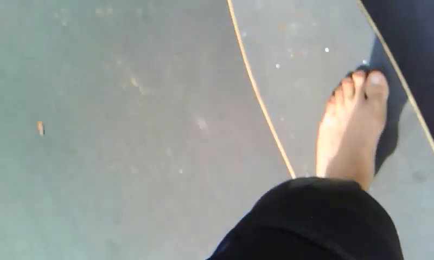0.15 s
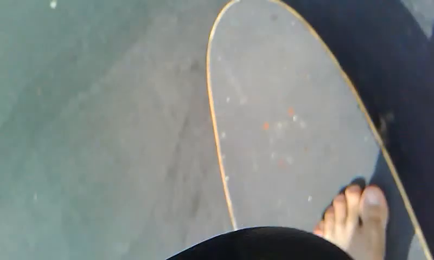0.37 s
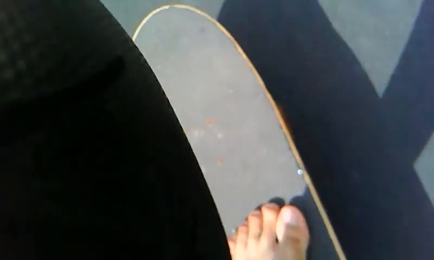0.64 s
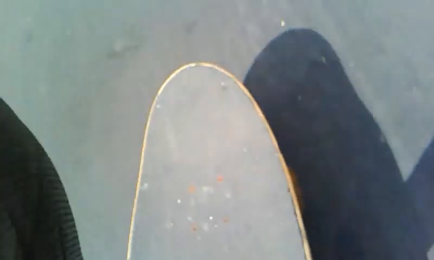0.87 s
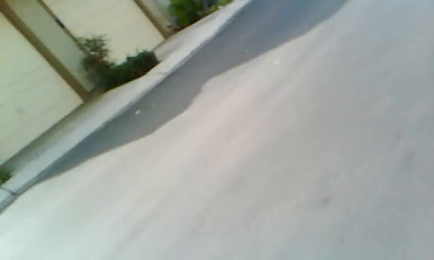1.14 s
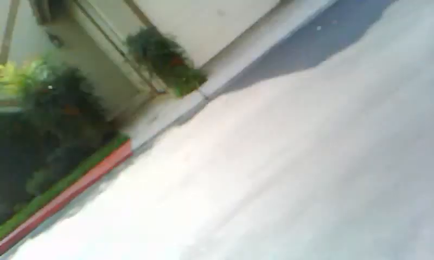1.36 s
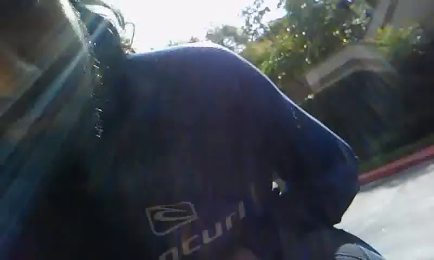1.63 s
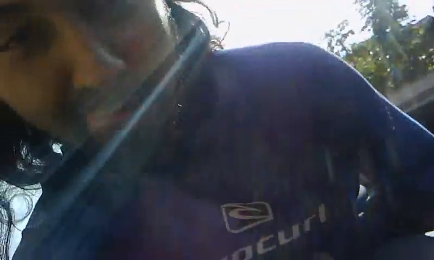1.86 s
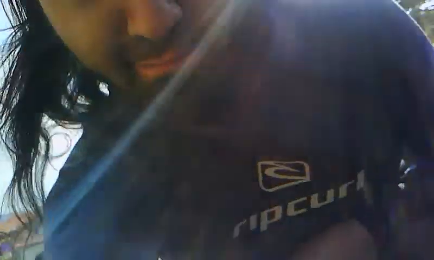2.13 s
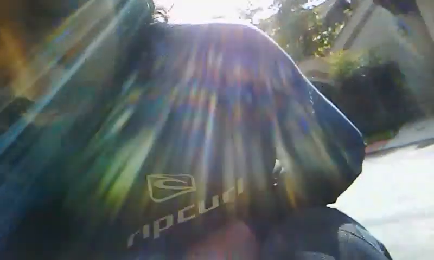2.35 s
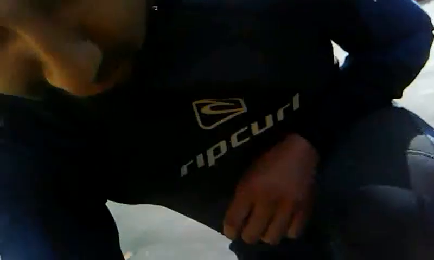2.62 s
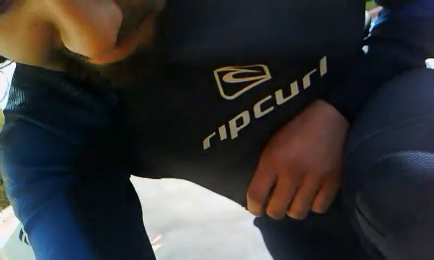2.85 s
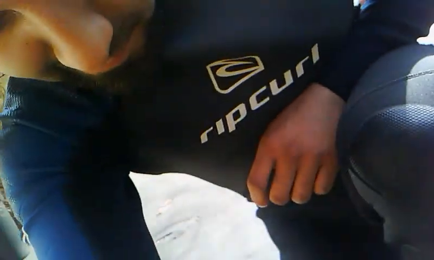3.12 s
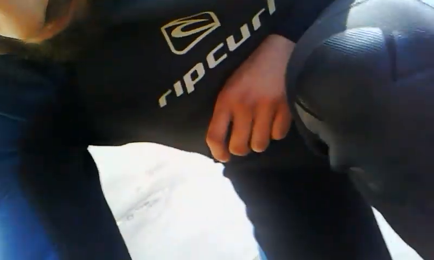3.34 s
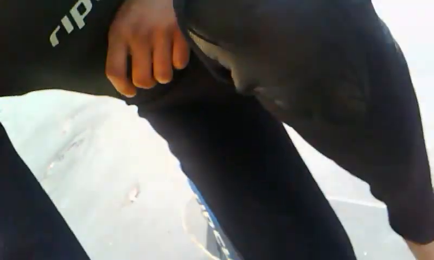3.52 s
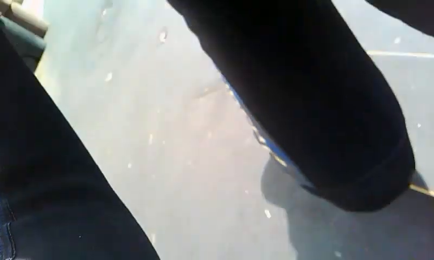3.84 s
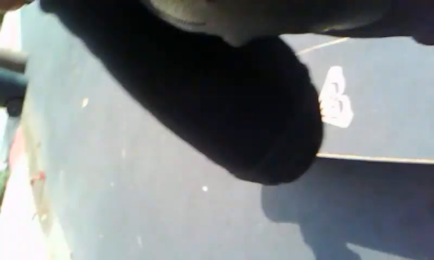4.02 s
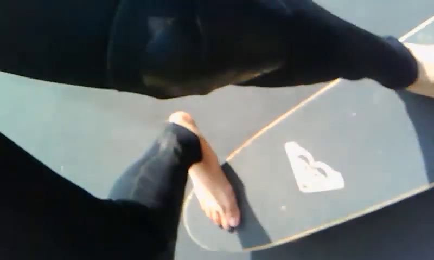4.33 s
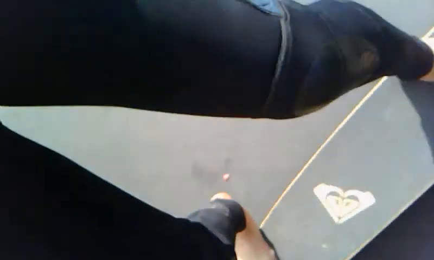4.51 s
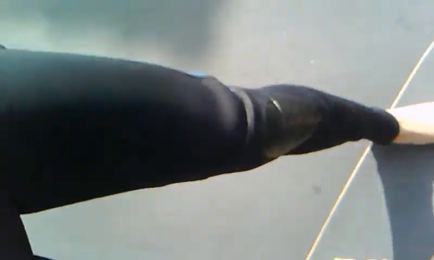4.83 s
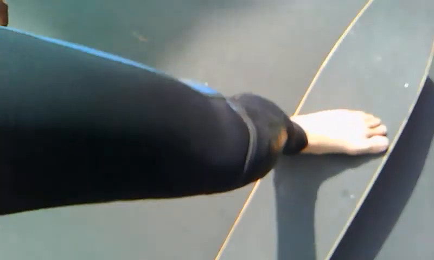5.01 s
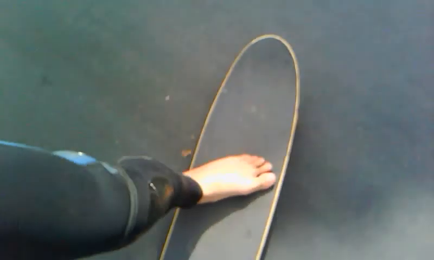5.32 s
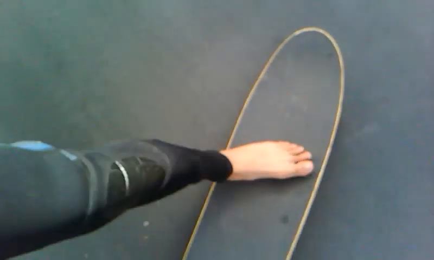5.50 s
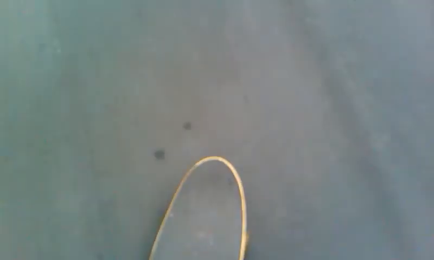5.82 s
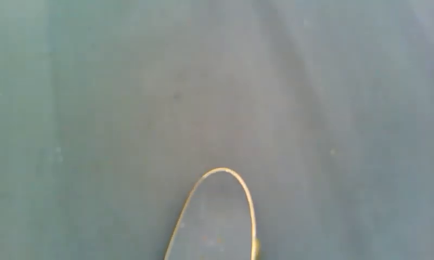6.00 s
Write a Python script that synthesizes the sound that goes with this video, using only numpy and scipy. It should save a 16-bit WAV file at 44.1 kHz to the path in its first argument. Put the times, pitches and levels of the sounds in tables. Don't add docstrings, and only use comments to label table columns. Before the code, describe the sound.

A board rolls on rough paving outdoors, heard through a small hand-held microphone in a hollow case, dull above about 4 kHz. From 0 to 1 s the wheels give a full, hollow rumble around 300-750 Hz with crackling grit, low fluttering wind and little cloth scuffs, including a quick rising zip at 0.3 s. Near 1 s the sound suddenly turns more shielded and hissy after a rough patch. A cluster of sharp snaps and scraping comes at 1.3 s, with a soft low bump at 1.42 s. The roll then continues evenly to about 4 s, with faint rubs and a gust at 3.1 s. From 4.2 s it surges in repeated swells. Hard, distorted, hollow knocks strike at 4.47, 4.89, 5.25 and 5.65 s, with a rattle, fading hiss and thin metallic hum; a faint ringing tap falls at 5.09 s. Small ticks and scuffs follow near 5.9 s as rolling swells again.

```python
import sys
import numpy as np
from scipy import signal
from scipy.fft import rfft, irfft, next_fast_len
from scipy.io import wavfile
from scipy.ndimage import uniform_filter1d, map_coordinates

SR = 44100
rng = np.random.default_rng(int(sys.argv[2]) if len(sys.argv) > 2 else 0)


def master(y):
    cut = np.clip(np.atleast_2d(y).T, -1, 1)
    pcm = np.round(cut * 32767)
    wavfile.write(sys.argv[1], SR, pcm.astype(np.int16))


def boost_factor(decibels):
    exponent = np.asarray(decibels, float) / 20
    return 10 ** exponent


N = 271656


def unit(x):
    return x / np.sqrt(np.mean(x ** 2) + 1e-20)


def along(points, hz):
    f, v = np.transpose(points)
    return np.interp(np.log(hz + 1), np.log(f + 1), v)


def curves(rows):
    s, *columns = np.transpose(rows)
    return [np.interp(np.arange(N) / SR, s, column) for column in columns]


def swells(rows):
    t = np.arange(N) / SR
    return sum(db * np.cos(np.pi * np.clip((t - s) / length, -.5, .5)) for s, db, length in rows)


def wobble(rate):
    knots = rng.standard_normal(int(N * rate / SR) + 4)
    return map_coordinates(knots, [np.arange(N) * rate / SR])


def filtered(x, response):
    m = next_fast_len(len(x) + SR // 4)
    return irfft(rfft(x, m) * response(np.fft.rfftfreq(m, 1 / SR)), m)[:len(x)]


def resonant(x, modes):
    def one(f, centre, width):
        return 1j * f * width / (centre * centre - f * f + 1j * f * width)

    def response(f):
        return sum((-1) ** k * boost_factor(db) * one(f, hz, width) for k, (hz, width, db) in enumerate(modes))

    return filtered(x, response)


def grit(rate, spread_db, smooth):
    chance, side, size = rng.random((3, N))
    stones = (chance < rate / SR) * np.sign(side - .5) * boost_factor(-spread_db * np.log(size + 1e-4))
    return np.sqrt(1 - smooth) * unit(stones) + np.sqrt(smooth) * rng.standard_normal(N)


# start_s (middle of the turn), length_s
CAMERA_TURNS = [
    (0.979, 0.035),
    (4.317, 0.14),
]


def poses():
    t = np.arange(N) / SR
    first, second = [np.clip((t - s) / length + .5, 0, 1) for s, length in CAMERA_TURNS]
    return 1 - first, first - second, second


# start_s, level_db (deck), coarse_db (hiss from coarser paving)
WHEEL_LEVELS = [(0.0, -34, 3.5), (0.11, -31.5, -0.5), (0.37, -25.5, -5), (1.05, -31, 6.5),
                (1.16, -28.5, 2.5), (1.84, -30.5, -0.5), (2.58, -30, -3.5), (2.71, -29.5, -3.5),
                (3.69, -31, 2), (3.93, -33, 3), (4.07, -36.5, 5)]


def wheels():
    return curves(WHEEL_LEVELS)


# nearest_s, gain_db, length_s
ARM_SWINGS = [
    (4.25, 11.5, 0.38),
    (4.666, 8.5, 0.33),
    (5.04, 10.5, 0.3),
    (5.46, 12.5, .3),
    (5.91, 11, 0.24),
    (6.064, 3.5, 0.13),
    (5.75, -1, 0.054),
    (6.16, 8.5, .06),
]


def swings():
    return swells(ARM_SWINGS)


# pitch_hz, width_hz, level_db
DECK_MODES = [
    [(283, 370, -4.5), (440, 135, 5.5), (596, 45.4, 6.5), (753, 110, -1), (928, 60, -8.5)],
    [(293.8, 54, -7.5), (430, 125, -10.5), (594.8, 36.5, 2), (740, 120, -4), (789, 134, -4),
     (1100, 480, -24.5)],
    [(300, 100, -5), (457.3, 58, 3), (560, 77, -3), (760, 121, -2), (890, 380, -11.5)],
]
DECK_POSE_DB = [-3, -1.5, -4]
# peak_s, gain_db, length_s
PAVING_SLABS = [
    (.2, 4, 0.13),
    (.5, 3, 0.082),
    (.76, 3, .14),
    (.93, 2, 0.11),
    (1.02, 7, 0.14),
    (1.36, 1, 0.06),
    (1.72, -4, 0.066),
    (2.85, -4, 0.14),
    (3.23, -2, 0.1),
    (3.89, -4.5, .06),
]


def deck():
    level_db = wheels()[0] + np.dot(DECK_POSE_DB, poses()) + swings() + swells(PAVING_SLABS) + 0.73 * wobble(9)
    road = grit(rate=990, spread_db=2.0, smooth=0.64) * boost_factor(1.1 * wobble(25))

    def steep(hz):
        return 1 / (1 + (hz / 1300) ** 4) / (1 + (200 / (hz + 1)) ** 4)

    heard = [unit(filtered(resonant(road, modes), steep)) for modes in DECK_MODES]
    return boost_factor(level_db) * sum(weight * sound for weight, sound in zip(poses(), heard))


# pitch_hz, level_db (per Hz)
HISS_COLOURS = [
    [(590, -26), (1000, -2), (1120, -11.5), (1610, -11.5), (2460, -15), (3330, -13.5), (4020, -18.5),
     (4500, -47.5), (5850, -78), (9900, -120)],
    [(590, -38), (1000, -4.5), (1080, -3), (1200, -8), (1570, -9.5), (2020, -18), (3310, -23),
     (3990, -23.5), (4500, -55), (5850, -91), (9900, -120)],
    [(590, -30.5), (1000, -7), (1090, -2), (1330, -8), (1940, -11), (3220, -19), (3750, -18), (4280, -42.5),
     (4500, -50.5), (5850, -90), (9900, -120)],
]
HISS_POSE_DB = [-20, -23.5, -26]


def hiss():
    near_db, coarse_db = wheels()
    level_db = near_db + coarse_db + np.dot(HISS_POSE_DB, poses()) + 0.34 * swings() + aftershock()
    road = grit(rate=2500, spread_db=3, smooth=.7)
    heard = [unit(filtered(road, lambda hz: boost_factor(along(colour, hz)))) for colour in HISS_COLOURS]
    fine = sum(weight * sound for weight, sound in zip(poses(), heard))
    z = signal.stft(fine, nperseg=512)[2]
    patches = uniform_filter1d(uniform_filter1d(rng.standard_normal(z.shape), 6, 0), 4, 1)
    fine = signal.istft(z * boost_factor(2.4 * unit(patches)), nperseg=512)[1][:N]
    return boost_factor(level_db + 5.5) * unit(boost_factor(1.2 * wobble(30)) * fine)


# pitch_hz, level_db (per Hz)
WIND_COLOUR = [(15, -66.5), (25, -36.5), (43, -20), (76, -13.5), (113, -4), (157, -2), (188, 0),
               (330, -10.5), (430, -31), (730, -120)]
# start_s, level_db
STEADY_WIND = [(0.0, -34), (0.6, -28), (1.0, -38.5), (1.42, -41.5), (1.6, -45.5), (2.09, -45.5),
               (2.24, -43.5), (3.03, -46.5), (3.15, -47), (3.76, -45.5), (4.19, -53), (4.4, -53)]
# peak_s, gain_db, length_s
WIND_GUSTS = [(.05, -0.5, 0.12), (.22, 3.5, 0.068), (.33, 5, 0.064), (.5, 3.5, 0.24), (.63, -6.5, 0.094),
              (.74, 2, 0.1), (1.27, 5, 0.12), (1.54, 5, 0.12), (1.89, 6, 0.2), (2.1, -4.5, 0.08),
              (2.47, 2.5, .1), (3.09, 9.5, 0.11), (3.47, 1, 0.12), (4.3, -5, 0.32), (5.1, -7.5, .12),
              (5.91, 6, 0.11), (6.1, -2.5, .2)]


def buffet():
    level_db = curves(STEADY_WIND)[0] - 0.5 + 0.74 * swings() + swells(WIND_GUSTS) + 0.8 * wobble(6.4)
    air = filtered(rng.standard_normal(N), lambda hz: boost_factor(along(WIND_COLOUR, hz)))
    lumps = unit(boost_factor(2.2 * wobble(16)) * air)
    hum = unit(resonant(resonant(rng.standard_normal(N), [(127.6, 19, 0)]), [(133, 140, 0)]))
    hum_share = .06 + .4 * poses()[1]
    return boost_factor(level_db) * (np.sqrt(1 - hum_share) * lumps + np.sqrt(hum_share) * hum)


# start_s, level_db
GRIT_FLICKS = [(0.076, -46), (.81, -54), (1.112, -42.5), (1.229, -44), (1.744, -54), (2.36, -50),
               (3.062, -54), (3.265, -52), (3.544, -45), (3.57, -51.5), (3.678, -49), (3.77, -51.5),
               (4.237, -38), (4.392, -46), (4.709, -46.5), (4.765, -47), (5.008, -41.5), (5.12, -47)]
# start_s, length_s, level_db
GRIT_DRAGS = [
    (1.291, 0.011, -30.5),
    (1.297, .036, -42),
    (1.385, 0.082, -36),
    (3.423, .056, -46),
    (3.984, .33, -45.5),
    (5.835, .055, -45),
    (5.948, 0.015, -45.5),
]
# start_s, length_s, pitch_hz (at first), level_db
CLOTH_SCUFFS = [(.264, .052, 3380, -46), (0.306, 0.024, 3080, -39.5), (0.339, 0.1, 3256, -43),
                (0.358, .073, 2607, -42), (0.44, .087, 2763, -45), (0.512, 0.021, 1546, -43),
                (0.729, 0.067, 3010, -62), (0.737, 0.044, 1903, -43), (0.91, .065, 1996, -44),
                (0.93, 0.02, 3120, -45.5), (0.977, 0.078, 3130, -52.5), (1.419, 0.026, 1096, -32),
                (2.59, 0.082, 2304, -48.5), (2.594, 0.042, 3220, -53.5), (4.325, 0.046, 3050, -43),
                (5.465, .065, 1912, -46), (5.474, 0.055, 3050, -51), (5.762, 0.02, 1590, -42.5),
                (5.882, 0.059, 1686, -34.5)]
# start_s, pitch_hz (at first), level_db
CLOTH_ZIPS = [
    (0.292, 1725, -37.5),
    (4.157, 1260, -39.5),
    (4.323, 1456, -40.5),
]


def strokes():
    flicks = [(s, .026, 2463, 0, 1700, db) for s, db in GRIT_FLICKS]
    drags = [(s, length, 2503, 3000, 1400, db) for s, length, db in GRIT_DRAGS]
    narrow = [(s, length, hz, 3000, 450, db) for s, length, hz, db in CLOTH_SCUFFS]
    zips = [(s, 0.068, hz, 26000, 590, db) for s, hz, db in CLOTH_ZIPS]
    return flicks + drags + narrow + zips


def scuffs():
    out = np.zeros(N)
    for s, length, first_hz, rise_hz, width_hz, db in strokes():
        u = np.linspace(0, 1, round(length * SR))
        phase = 2 * np.pi * np.cumsum(first_hz + rise_hz * length * u) / SR
        grains = rng.standard_normal((2, SR // 2)) ** 3
        slow = [filtered(v, lambda hz: 1 / (1 + (hz / (.7 * width_hz)) ** 2))[:len(u)] for v in grains]
        band = unit(slow[0] * np.cos(phase) + slow[1] * np.sin(phase))
        out[round(s * SR):][:len(u)] += boost_factor(db) * 1.3 * np.sin(np.pi * u ** .8) * band
    return out


# start_s, level_db (peak), body_db (push into the case)
CASE_TICKS = [(.563, -66, 46), (1.2912, -19, 1), (1.2947, -14, 1), (1.297, -12, 6), (1.3092, -10, 0),
              (1.3925, -25, 0), (4.238, -24, -11), (4.4666, -17.5, 0.5), (5.886, -41, 13), (5.904, -32, 15),
              (5.911, -29, 6.5), (5.952, -38.5, 13.5)]


def ticks():
    snap, push = np.zeros(N), np.zeros(N)
    for s, db, body_db in CASE_TICKS:
        snap[round(s * SR)] = -boost_factor(db)
        push[round(s * SR)] = -boost_factor(db + body_db + 24.5)
    click = resonant(resonant(snap, [(2000, 2400, 0.0062)]), [(2200, 4100, 0.01)])
    return click + resonant(push, [(420, 580, 0.007)])


# start_s, level_db (peak), pitch_hz (ring), t60_s
KNOCK_BLOWS = [(1.42, -15.5, 130, 0.055), (1.4323, -10, 152, 0.036), (4.4689, -4, 632, 0.044),
               (4.4740, 6.5, 469.6, 0.034), (4.4800, -7.5, 535, 0.05), (4.4906, -4, 445, 0.07),
               (4.8837, -0.4, 440, 0.054), (4.891, 7, 452, 0.031), (4.9074, -1.5, 690, 0.014),
               (5.082, -20, 463, 0.35), (5.096, -22, 423, 0.11), (5.2530, -3.5, 618, 0.047),
               (5.2560, 3.5, 696, 0.017), (5.257, -9, 1040, 0.035), (5.2617, 6.5, 440, 0.037),
               (5.2703, -0.5, 887, 0.015), (5.2730, -3, 440, 0.087), (5.6418, -12, 488, 0.03),
               (5.6459, -4, 465, 0.03), (5.6482, 1, 456, 0.028), (5.657, -3, 458, 0.022),
               (5.6636, -6.5, 430, 0.029), (5.6694, -4.5, 430, 0.041)]
# start_s, rattle_db (of its first blow)
KNOCK_RATTLES = [
    (1.421, -8),
    (4.4671, 0.56),
    (4.8863, -11),
    (5.085, -21),
    (5.253, -4.5),
    (5.64, 0),
]
# pitch_hz, width_hz, level_db
RATTLE_MODES = [(715, 110, 9), (1140, 440, -9), (1600, 220, -1), (1975, 280, 0), (2380, 100, -1.5),
                (3203, 330, -5.5)]


def knocks():
    ring, shake = np.zeros(N + SR), np.zeros(N + SR)
    t = np.arange(SR // 5) / SR
    rise = 1 - np.exp(-t / .0011)
    jolt_s = 0.0015
    for s, db, hz, t60 in KNOCK_BLOWS:
        first_s, first_db = [knock for knock in KNOCK_RATTLES if knock[0] < s + .004][-1]
        rattle_db = first_db - 649 * (s - first_s)
        fade = boost_factor(db - 60 * t / t60) * rise
        jolt = boost_factor(db - 26.0) * (1 - t / jolt_s) * np.exp(-t / jolt_s)
        ring[round(s * SR):][:len(t)] -= fade * np.sin(2 * np.pi * hz * t) + jolt
        loose = fade + boost_factor(db - 30.5 - 60 * t / 0.57)
        chatter = unit(rng.laplace(size=len(t)) * rng.random(len(t)) ** 2)
        shake[round(s * SR):][:len(t)] += boost_factor(rattle_db) * loose * chatter
    return ring[:N] + 3 * resonant(shake[:N], RATTLE_MODES)


def since_hard_blows():
    overload_db = -3
    return np.arange(N) / SR - np.array([[s] for s, db, *_ in KNOCK_BLOWS if db > overload_db])


def aftershock():
    since = since_hard_blows()
    return 22 * np.max((since > 0) * np.exp(-np.abs(since) / 0.079), axis=0)


def axle():
    hz, width_hz, t60_s = 1550, 35, 0.46
    since = since_hard_blows()
    fade = np.max((since > 0) * boost_factor(-60 * np.abs(since) / t60_s), axis=0)
    hum = resonant(resonant(rng.standard_normal(N), [(hz, width_hz, 0)]), [(hz, 4 * width_hz, 0)])
    return boost_factor(-38) * fade * unit(hum)


def scene():
    return (deck() + hiss() + buffet() + scuffs() + ticks() + knocks() + axle())[None]


def top_cut(x):
    return signal.sosfilt(signal.butter(12, 16480, fs=SR, output="sos"), x)


# pitch_hz, level_db
RECORDER_BAND = [(20, -21), (50, 2.5), (100, 4), (3300, -2), (3800, -12), (4200, -15.5), (4600, -46.5)]


def record(dry):
    overload = np.clip(dry[0], -.76, .76)
    narrow = filtered(overload, lambda hz: boost_factor(along(RECORDER_BAND, hz)) * (hz < 4800))
    return top_cut(np.clip(narrow, -.708, .708)[None])


dry = scene()
out = record(dry)
master(out)
```